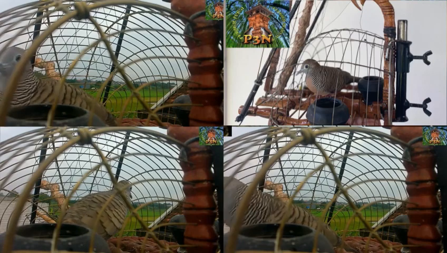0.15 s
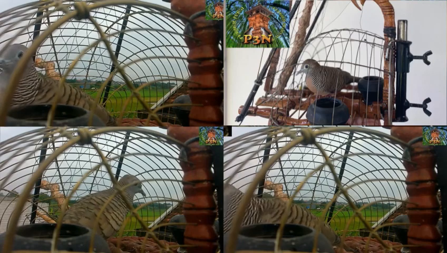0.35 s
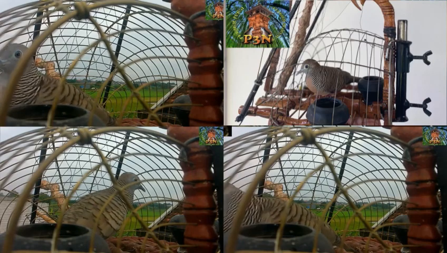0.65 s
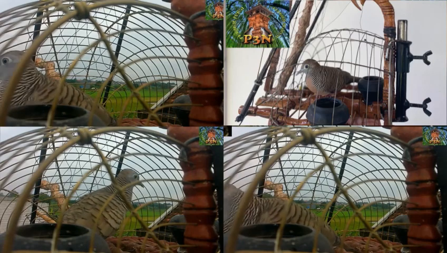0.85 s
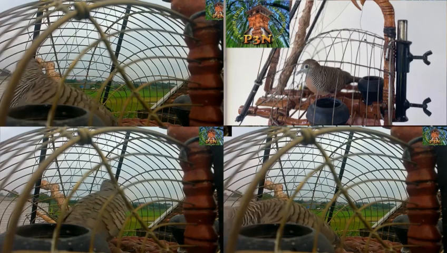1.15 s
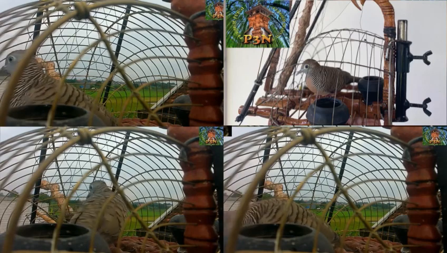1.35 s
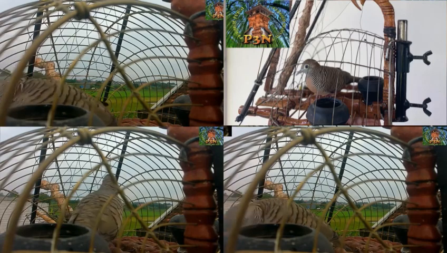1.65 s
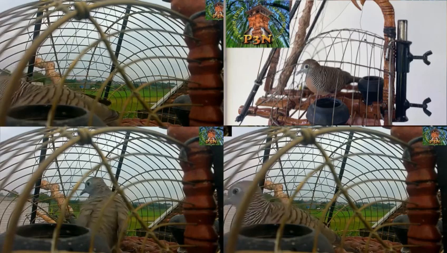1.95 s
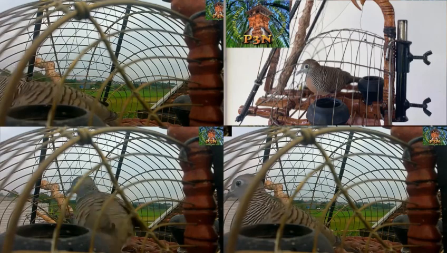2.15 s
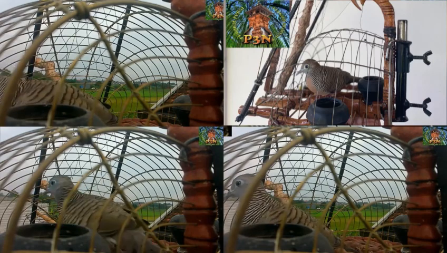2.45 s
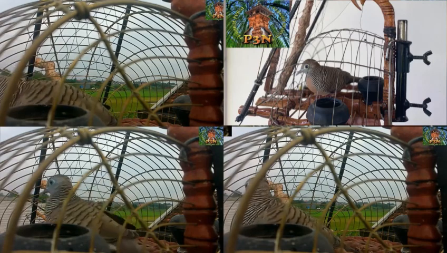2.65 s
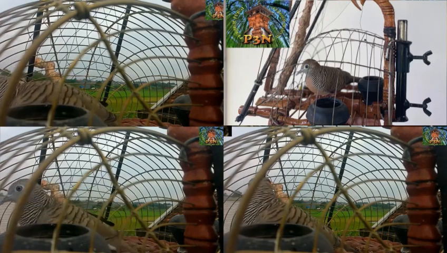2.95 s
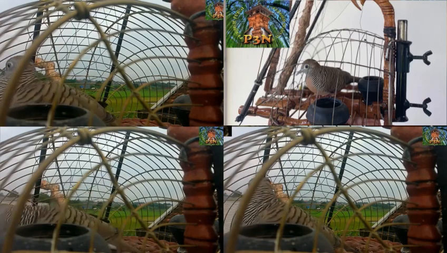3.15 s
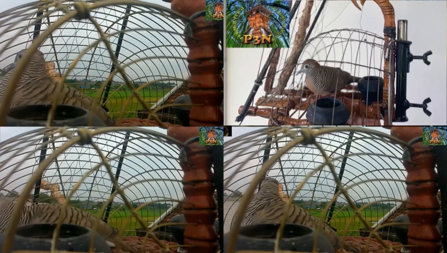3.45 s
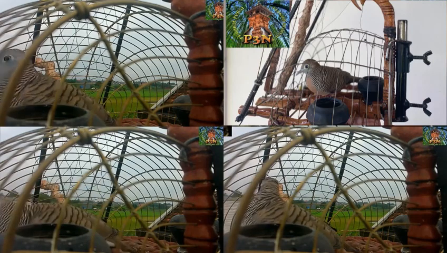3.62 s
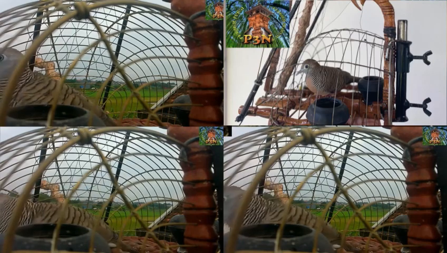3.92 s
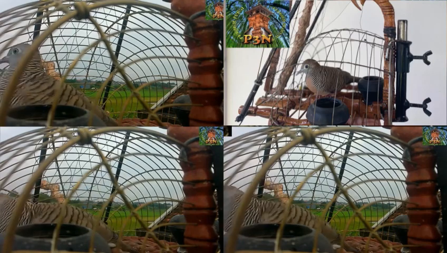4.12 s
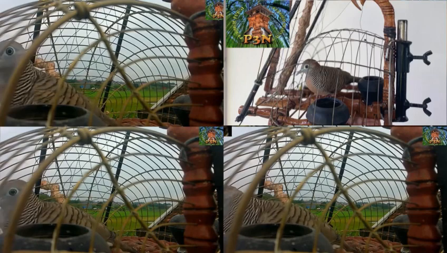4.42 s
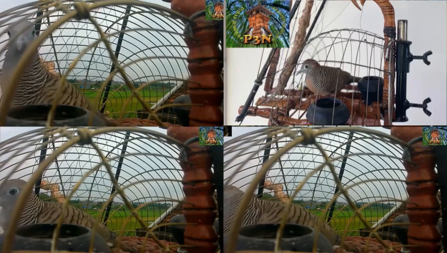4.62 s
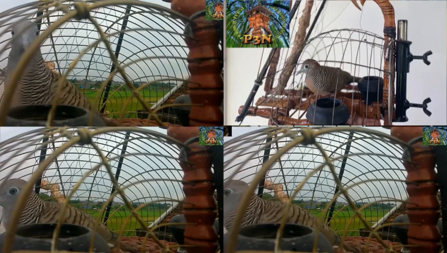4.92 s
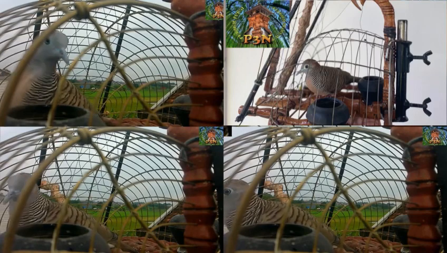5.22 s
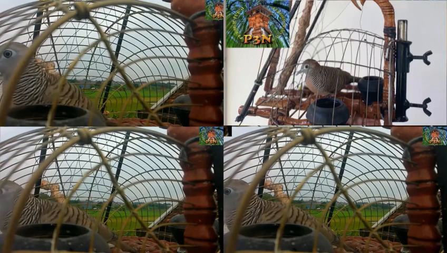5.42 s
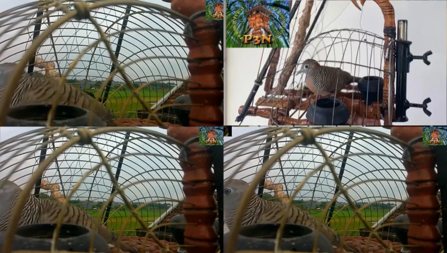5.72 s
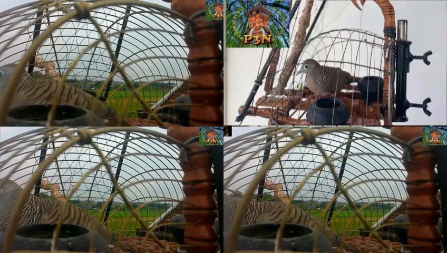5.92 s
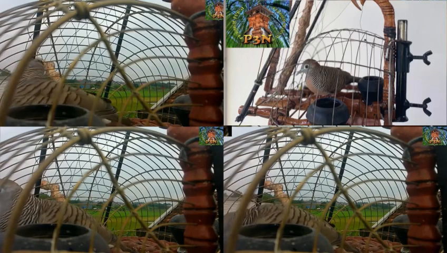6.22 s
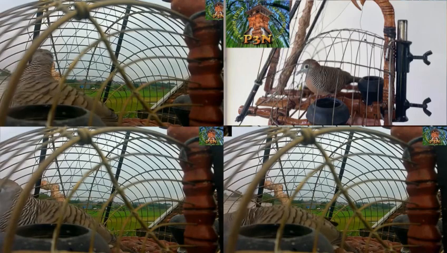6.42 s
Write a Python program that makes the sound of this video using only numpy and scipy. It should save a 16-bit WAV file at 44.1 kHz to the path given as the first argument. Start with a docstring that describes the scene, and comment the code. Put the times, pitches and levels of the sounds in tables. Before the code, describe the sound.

Over a steady low rumble of open air and distant traffic, several doves answer each other with rolling, stuttering coos. Most sound soft and breathy at a distance, but one sits close to the microphone and twice delivers a loud five-part phrase that slightly overloads it. Small scrapes of claws on wood fall between the calls. Far songbirds chirp thinly, mostly midway, above a very faint insect shimmer.

```python
"""Caged doves coo outdoors: soft calls a little way off, then one bird close enough to overload its mic.
Each coo is a train of syrinx pulses speeding up from rough clicks into a whistle, rung through the
inflated crop. Every cage has its own small microphone, all mixed to one channel. Claws scuff the
perches, and behind them sit distant birds, an insect chorus and a rumble of breeze and traffic."""
import sys
import numpy as np
from scipy import signal
from scipy.io import wavfile
from scipy.ndimage import uniform_filter1d

SR = 44100
rng = np.random.default_rng(int(sys.argv[2]) if len(sys.argv) > 2 else 0)


def generate_wav(signal):
    """Clip the signal to [-1, 1] and save it as 16-bit WAV at the path in sys.argv[1]."""
    frames = np.transpose(np.atleast_2d(signal))
    scaled = np.clip(frames, -1, 1) * 32767
    pcm = np.round(scaled).astype(np.int16)
    wavfile.write(sys.argv[1], SR, pcm)


N = 289737

HELD_ABOVE_S = .07  # longer notes are sung as "held"
# The doves' cue sheet, timed at each upward pitch jump:
# (time [s], bird, kind, scoop length [s], whistle length [s], top pitch [Hz], level [dB])
COO_CUES = [(.218, "middle", "roll", .014, .128, 1250, -23.5),
            (0.352, "middle", "note", .003, 0.04, 1176, -25.5),
            (0.355, "far", "roll", .01, 0.19, 1280, -34.5),
            (.422, "middle", "note", .012, 0.029, 1163, -22.5),
            (.513, "middle", "note", .012, 0.031, 1154, -23),
            (0.542, "far", "note", .009, 0.035, 1125, -31.5),
            (0.627, "middle", "note", .012, 0.096, 1214, -25),
            (0.714, "far", "note", .009, 0.037, 1182, -30),
            (0.836, "far", "note", .012, 0.096, 1206, -33.5), (1.958, "near", "roll", .01, .19, 1289, -7),
            (1.99, "middle", "roll", .014, 0.14, 1200, -26),
            (2.025, "middle", "roll", .014, 0.16, 1241, -26),
            (2.133, "middle", "note", .003, 0.019, 1140, -32.5),
            (2.164, "near", "note", .009, 0.04, 1156, -2.5),
            (2.187, "middle", "note", .012, 0.02, 1150, -27),
            (2.221, "middle", "note", .012, .032, 1167, -26),
            (2.259, "near", "note", .009, 0.045, 1187, -2.5),
            (2.274, "middle", "note", .012, 0.026, 1120, -29.5),
            (2.311, "middle", "note", .012, 0.046, 1190, -27.5),
            (2.38, "near", "note", .013, 0.1, 1209, -4.5), (2.386, "middle", "note", .012, .109, 1200, -44),
            (2.42, "middle", "note", .012, 0.12, 1225, -29),
            (2.593, "near", "note", .013, 0.12, 1196, -6.5),
            (3.315, "middle", "roll", .014, 0.13, 1274, -23.5),
            (3.458, "middle", "note", .003, .031, 1163, -25),
            (3.525, "middle", "note", .012, 0.027, 1154, -23),
            (3.617, "middle", "note", .012, 0.038, 1182, -24.5),
            (3.728, "middle", "note", .012, 0.12, 1224, -26.5),
            (3.784, "far", "roll", .01, .162, 1293, -35), (3.949, "far", "note", .009, 0.07, 1158, -33.5),
            (3.993, "middle", "roll", .014, 0.14, 1260, -23.5),
            (4.036, "far", "note", .009, 0.066, 1170, -33),
            (4.13, "middle", "note", .003, 0.044, 1172, -23),
            (4.192, "middle", "note", .012, 0.025, 1125, -23.5),
            (4.26, "far", "note", .012, .092, 1213, -32.5),
            (4.275, "middle", "note", .012, 0.0355, 1156, -23.5),
            (4.386, "middle", "note", .012, 0.1, 1218, -26), (4.408, "far", "note", .012, 0.1, 1165, -45),
            (5.359, "middle", "roll", .014, 0.14, 1270, -24),
            (5.496, "middle", "note", .003, 0.057, 1146, -27.5),
            (5.559, "near", "roll", .01, 0.19, 1287, -6.5),
            (5.569, "middle", "note", .012, 0.05, 1180, -23.5),
            (5.661, "middle", "note", .012, 0.044, 1160, -23.5),
            (5.763, "near", "note", .009, 0.039, 1154, -2.5),
            (5.769, "middle", "note", .012, .104, 1216, -24.5),
            (5.857, "near", "note", .009, 0.046, 1190, -3), (5.978, "near", "note", .013, 0.1, 1209, -5),
            (6.12, "far", "roll", .01, .22, 1310, -34), (6.191, "near", "note", .013, .12, 1195, -6.5),
            (6.381, "far", "note", .009, 0.043, 1138, -32),
            (6.416, "middle", "roll", .014, 0.13, 1270, -26.5),
            (6.477, "far", "note", .009, 0.053, 1180, -32.5),
            (6.551, "middle", "note", .003, 0.044, 1190, -32)]


def dove(bird, manner, tone, crop_hz, crop_width_hz, crop_db, puff_db, echo_db):
    """Syrinx pulses speed up from rough clicks into a whistle; the inflated crop rings at one pitch."""
    voice = np.zeros(N)
    for start, _, kind, scoop_s, length, top_hz, db in [cue for cue in COO_CUES if cue[1] == bird]:
        shape = manner["held" if kind == "note" and length > HELD_ABOVE_S else kind]
        t, hz, effort_db = coo_contour(scoop_s, length, top_hz, **shape)
        hz = uniform_filter1d(hz, 120, mode="nearest")
        wobble, air = rng.standard_normal((2, SR // 3))
        slack = np.clip(1 - hz / 900, 0, 1)  # slack membranes beat unevenly and leak air
        jitter = (.064 + 2.3 * slack) * uniform_filter1d(wobble, 200)[:len(t)]
        cycles = np.cumsum(hz * (1 + jitter)) / SR
        pulses = sum(gain_of(curve_db(tone, k * hz)) * np.cos(2 * np.pi * k * cycles)
                     for k in range(1, 10))
        breath = unit_rms(resonate(resonate(air, 450, 380), 450, 390))[:len(t)]
        puff = gain_of(puff_db) * slack * breath
        fades = np.minimum((t - t[0]) / .0076, 1) * np.minimum((t[-1] - t) / .0033, 1)
        add(voice, start + t[0], np.sqrt(2) * gain_of(db + effort_db) * fades * (pulses + puff))
    voice = voice + gain_of(crop_db) * resonate_twice(voice, crop_hz, crop_width_hz)
    return voice + gain_of(echo_db) * echoes(voice, t60=.093)


def coo_contour(scoop_s, length, top_hz, count, dwell_s, jump_s, dwell_db, scoop_db, arch, release_s,
                release_hz, release_db, sag_hz=0, deepen=1, swell_db=0, hurry=1, dip_db=0, dip_width=1):
    """Time, pitch and effort of a coo: scoop up, dwell near the crop's pitch, jump, arch and release."""
    t = np.arange(-dwell_s - scoop_s, length, 1 / SR)
    rise_hz, peak, fall_hz, roundness = arch
    octaves_under = 125 * np.maximum(-dwell_s - t, 0)  # the scoop climbs 125 octaves a second
    onset_hz = np.interp(t, [-dwell_s, 0, jump_s], [870.5, 1014.3, top_hz - rise_hz])
    onset_hz /= 2 ** octaves_under
    onset_db = np.interp(t, [-dwell_s, jump_s], [dwell_db, 0]) + scoop_db * octaves_under
    beats = count * np.clip((t - jump_s) / (length - jump_s - release_s), 0, 1 - 1 / SR) ** hurry
    index, place, joint = beats // 1, beats % 1, np.round(beats)  # one pitch arch per beat
    below_top_hz = np.where(place < peak, rise_hz * abs(1 - place / peak) ** roundness,
                            fall_hz * abs((place - peak) / (1 - peak)) ** roundness)
    release = np.clip(1 - (length - t) / release_s, 0, 1)
    whistle_hz = top_hz - sag_hz * index - deepen ** index * below_top_hz - release_hz * release
    dips_db = dip_db * np.exp(-((beats - joint) / dip_width) ** 2) * (joint > 0) * (joint < count)
    effort_db = onset_db + swell_db * beats + dips_db + release_db * release
    return t, np.where(t < jump_s, onset_hz, whistle_hz), effort_db


# Bold delivery with wide-swinging rolls: coo_contour settings for "roll", "note" and "held".
# Each arch is (rise [Hz], place of the peak [0-1], fall [Hz], roundness).
BOLD_MANNER = {"roll": dict(count=3, dwell_s=.025, jump_s=0.01055, dwell_db=-6, scoop_db=-10.5, arch=(140, 0.56, 120, 1.5),
               sag_hz=35.56, deepen=.9, swell_db=1.35, hurry=1.148, dip_db=-5.5, dip_width=0.13, release_s=0.016, release_hz=30, release_db=-47.5),
               "note": dict(count=0.97, dwell_s=0.0056, jump_s=0.009, dwell_db=-9.5, scoop_db=-23, arch=(52, 0.49, 58, 2.55),
               release_s=.011, release_hz=60, release_db=-20),
               "held": dict(count=0.96, dwell_s=0.0081, jump_s=0.0098, dwell_db=-6.5, scoop_db=-14, arch=(34, 0.34, 85, 2.6),
               swell_db=-1.5, release_s=0.013, release_hz=70, release_db=-22)}
# Colour of throat and air, close up: (frequency [Hz], level [dB])
NEAR_COLOUR = [(150, -12.5), (500, -28), (800, -8.5), (1000, -7.5), (1120, 0), (1300, -2), (1600, -33.5),
               (2000, -33.5), (2500, -38), (3600, -41.5), (6000, -88)]
# EQ of the nearest bird's microphone: (frequency [Hz], level [dB])
MIC_EQ = [(300, -3.5), (980, 0), (1130, 0), (1300, -0.5), (2900, -4), (3600, -6.5), (6000, -2),
          (8500, -5.5), (11000, -5), (13300, -6), (15500, -3.5)]


def near_dove():
    """The closest bird overloads its microphone: overtones and a wideband hiss on the loudest coos."""
    voice = dove("near", BOLD_MANNER, NEAR_COLOUR,
                 crop_hz=952, crop_width_hz=121, crop_db=3.5, puff_db=-5.5, echo_db=-25)
    rumble = gain_of(-52.5) * unit_rms(resonate(rng.standard_normal(N), 210, 560))
    hiss = gain_of(-46) * rng.standard_normal(N)
    noise = rumble + hiss
    limit, knee, bias = .46, 30, .006  # the bias makes the limit lopsided: faint even overtones
    drive = voice + noise + bias
    clipped = drive / (1 + abs(drive / limit) ** knee) ** (1 / knee)
    overloaded = clipped - bias - noise  # the noise stays only where the peaks flatten
    hz = np.linspace(0, SR / 2, 1025)
    mic = signal.firwin2(1023, hz, gain_of(curve_db(MIC_EQ, hz)), fs=SR)
    return signal.oaconvolve(overloaded, mic, "same")


# Soft delivery with shallower rolls, laid out like BOLD_MANNER.
SOFT_MANNER = {"roll": dict(count=3, dwell_s=0.019, jump_s=0.0049, dwell_db=-6, scoop_db=-3.5, arch=(23, .6, 33, 1.2),
               sag_hz=21.5, deepen=1.66, swell_db=-0.7, hurry=0.99, dip_db=-3, dip_width=0.082, release_s=.008, release_hz=40, release_db=-26),
               "note": dict(count=0.91, dwell_s=.008, jump_s=0.0066, dwell_db=-3, scoop_db=-11.5, arch=(25, 0.51, 99, 2.3),
               release_s=0.013, release_hz=60, release_db=-20.5),
               "held": dict(count=1, dwell_s=0.0072, jump_s=0.0063, dwell_db=0.5, scoop_db=-10.5, arch=(55, .33, 95, 2.24),
               swell_db=-5, release_s=0.0089, release_hz=30, release_db=-28)}
# Colour of throat and air, mid-distance and far off: (frequency [Hz], level [dB])
MIDDLE_COLOUR = [(150, -3), (450, 10.5), (750, -6), (900, 5.5), (985, 6), (1090, 0), (1300, -4),
                 (1600, -41), (2400, -36), (3600, -38), (6000, -65)]
FAR_COLOUR = [(150, -27.5), (500, -30), (800, -11), (1000, 1), (1300, 0), (1600, -43.5), (2400, -50.5),
              (3600, -23.5), (6000, -68)]


def answering_doves():
    """Coos from further off: breathy at mid-distance, thinner and wetter far away."""
    middle = dove("middle", SOFT_MANNER, MIDDLE_COLOUR,
                  crop_hz=974, crop_width_hz=120, crop_db=0, puff_db=4, echo_db=-19.5)
    far = dove("far", BOLD_MANNER, FAR_COLOUR,
               crop_hz=950, crop_width_hz=55, crop_db=-5, puff_db=-13, echo_db=-11)
    return middle + far


# Foley on perch and bars: (time [s], level [dB], time to fade 20 dB [s], upper resonance [Hz])
SCUFF_CUES = [(0.148, -36.5, 0.0086, 1090), (0.176, -47, 0.048, 1400), (0.619, -43, 0.037, 1650),
              (0.711, -44, 0.049, 1620), (1.448, -35.5, 0.1, 1440), (1.882, -24.5, 0.008, 1160),
              (1.889, -36.5, 0.029, 1534), (1.915, -30.5, 0.054, 1230), (1.945, -35, 0.062, 1480),
              (1.904, -31, 0.18, 614), (2.831, -44, 0.084, 1450), (3.939, -42.5, 0.12, 1450),
              (4.427, -40.5, 0.053, 1550), (4.606, -49.5, .05, 1430), (5.322, -50, 0.055, 1300),
              (5.483, -38, .008, 1600), (5.517, -34.5, 0.027, 1595), (6.175, -28, 0.066, 1435),
              (6.407, -44, 0.11, 1470)]


def perch_scuffs():
    """Claws scrape the perch: a sharp start, a grainy fade, two wooden resonances."""
    out, t = np.zeros(N), np.arange(SR // 5) / SR
    for start, db, fade_s, hz in SCUFF_CUES:
        scrape = rng.standard_normal(len(t))
        grain_db = 3.1 * rng.standard_normal(len(t) // 60 + 1).repeat(60)[:len(t)]
        scrape *= gain_of(grain_db)
        upper = resonate(resonate(scrape, hz, 500), hz, 400)
        lower = resonate_twice(scrape, .4 * hz, 210)
        add(out, start, gain_of(db - 20 * (t / fade_s) ** 2) * unit_rms(upper + 1.08 * lower))
    return out


# Distant birds, thin high songbird whistles and a few faint, low dove coos:
# (time [s], length [s], start pitch [Hz], end pitch [Hz], level [dB])
DISTANT_CALLS = [(0, .2, 6500, 7450, -50.5), (0.045, 0.28, 3690, 3620, -59), (0.014, .29, 4360, 4600, -63),
                 (.26, .22, 853, 873, -47), (.985, .085, 7830, 7950, -56.5), (1.156, .096, 1356, 1390, -50),
                 (1.28, .13, 4850, 4770, -58.5), (1.534, .18, 878, 872, -47.5),
                 (1.607, .11, 3950, 4080, -51.5), (2.257, .15, 7370, 7500, -54.5),
                 (2.799, .12, 892, 858, -43), (2.912, .11, 3496, 3330, -46), (3.079, .063, 3900, 3400, -50),
                 (3.098, .074, 7040, 4660, -48), (3.144, .051, 6000, 5780, -49),
                 (3.213, .1, 6950, 7660, -56.5), (3.308, .051, 6230, 4200, -47),
                 (3.363, .092, 3220, 3300, -54), (3.405, .03, 6960, 5700, -49),
                 (3.422, .09, 6850, 7600, -58), (3.53, .11, 3230, 3110, -56),
                 (3.584, .065, 6500, 4050, -47), (3.691, .037, 6700, 5350, -47),
                 (3.703, .077, 3150, 3070, -51), (3.848, .049, 2960, 3100, -49),
                 (3.866, .11, 3500, 3600, -55), (3.986, .043, 3070, 2760, -51),
                 (4.184, .033, 6270, 5480, -47), (4.255, .063, 6740, 6744, -55),
                 (4.27, .061, 4770, 4600, -53), (4.306, .022, 4730, 6560, -47.5),
                 (4.366, .027, 5200, 6850, -49.5), (4.466, .028, 5700, 4930, -47.5),
                 (4.584, .026, 4860, 6300, -46.5), (4.845, .13, 4400, 4680, -55),
                 (5.874, .072, 3500, 3870, -55), (6.2, .083, 7560, 7650, -51),
                 (6.328, .057, 7530, 8000, -49.5), (6.453, .076, 7370, 6900, -54),
                 (6.515, .05, 3800, 4000, -48)]


def distant_birds():
    """Gliding sine calls blurred by distance, over a faint random twitter of farther birds."""
    out, twitter = np.zeros(N), []
    for when, span, pitch, slope, strength in rng.random((300, 5)):
        hz = 2800 + 5200 * pitch
        twitter.append((when * N / SR, .025 + .2 * span, hz, hz * (.85 + .31 * slope),
                        -70 + 7.7 * strength))
    for start, length, from_hz, to_hz, db in DISTANT_CALLS + twitter:
        progress = np.linspace(0, 1, round(length * SR))
        bend = .5 if to_hz < from_hz else .74  # falls drop fast and level off, rises run straighter
        glide_hz = from_hz + (to_hz - from_hz) * progress ** bend
        # wind and an unsteady throat
        waver = 1 + .2 * uniform_filter1d(rng.standard_normal(SR // 2), 300)[:len(progress)]
        cycles = np.cumsum(glide_hz * waver) / SR
        fades = signal.windows.tukey(len(progress), .3)
        add(out, start, np.sqrt(2) * gain_of(db) * fades * np.sin(2 * np.pi * cycles))
    return gain_of(-3) * out + gain_of(-2.5) * echoes(out, t60=.41)


# Insect shimmer, one steady band and one throbbing:
# (centre [Hz], width [Hz], level [dB], throb rate [Hz], throb depth [0-1])
INSECT_BANDS = [(6135, 400, -61, 31, 0), (6660, 91, -65.5, 14, 0.77)]


def insects():
    """Many far stridulating insects merge into narrow bands of noise."""
    out, t = np.zeros(N), np.arange(N) / SR
    for hz, width_hz, db, throb_hz, depth in INSECT_BANDS:
        band = unit_rms(resonate_twice(rng.standard_normal(N), hz, width_hz))
        out += gain_of(db) * band * (1 + depth * np.sin(2 * np.pi * throb_hz * t))
    return out


# Bass-heavy open-air bed: (frequency [Hz], relative level [dB])
RUMBLE_SPECTRUM = [(20, -5.5), (32, -3.5), (80, 1), (140, -1.5), (190, -10), (450, -6), (620, -20),
                   (800, -22), (1500, -32), (3200, -34), (7300, -44.5), (7900, -43.5), (11500, -47.5),
                   (12300, -67.5), (15600, -60)]


def field_rumble():
    """Breeze and far traffic: shaped noise with drifting patches of colour and a slow swell."""
    frames, hz = N // 512 + 5, np.fft.rfftfreq(2048, 1 / SR)
    real, imag, patches = rng.standard_normal((frames, 1025, 3)).T
    patches = unit_rms(uniform_filter1d(uniform_filter1d(patches, 14, axis=0), 8, axis=1))
    t = np.arange(frames) * 512 / SR
    swell = unit_rms(sum(np.sin(2 * np.pi * (rate * t + rng.random())) / np.sqrt(rate)
                         for rate in np.geomspace(.2, 4, 20)))
    shape_db = curve_db(RUMBLE_SPECTRUM, hz)[:, None] + 1.88 * patches + 1.1 * swell
    _, bed = signal.istft((real + 1j * imag) * gain_of(shape_db), nperseg=2048, noverlap=1536)
    return gain_of(-33) * unit_rms(bed[:N])


def echoes(x, t60):
    """Sparse reflections from cage bars, ground and walls, dying by 60 dB in t60 seconds."""
    n = SR // 4
    taps = rng.choice([-1., 1.], n) * (rng.random(n) < .05)
    taps *= gain_of(-60 * np.arange(n) / SR / t60)
    taps[:300] = 0  # 7 ms pre-delay
    return signal.oaconvolve(x, taps / np.linalg.norm(taps))[:N]


def resonate(x, hz, width_hz):
    """A resonance with a peak gain of 1."""
    return signal.lfilter(*signal.iirpeak(hz, hz / width_hz, SR), x)


def resonate_twice(x, hz, width_hz):
    """Two equal resonances in series, for steeper skirts."""
    return resonate(resonate(x, hz, width_hz), hz, width_hz)


def gain_of(db):
    """Decibels to gain."""
    return 10 ** (np.asarray(db) / 20)


def unit_rms(x):
    """Scales to rms 1."""
    return x / np.sqrt(np.mean(x ** 2) + 1e-20)


def curve_db(points, hz):
    """Reads an EQ curve on a log-frequency axis."""
    point_hz, db = np.transpose(points)
    return np.interp(np.log(hz + 1), np.log(point_hz + 1), db)


def add(mix, start, sound):
    """Mixes a sound in at start seconds."""
    part = mix[max(round(start * SR), 0):][:len(sound)]
    part += sound[:len(part)]


def scene():
    """Doves up front over the open-air bed, in mono."""
    doves = answering_doves() + near_dove()
    return (doves + distant_birds() + perch_scuffs() + insects() + field_rumble())[None]


def record(dry):
    """A steep top cut, and the converter's steady offset."""
    cutoff_hz, dc_offset = 15600, .1463
    lowpass = signal.firwin(511, cutoff_hz, window=("kaiser", 9), fs=SR)
    return signal.oaconvolve(dry, lowpass[None], "same") + dc_offset


dry = scene()
out = record(dry)
generate_wav(out)
```